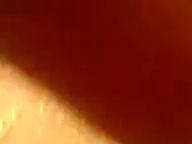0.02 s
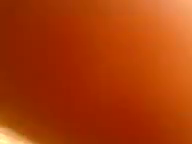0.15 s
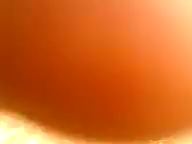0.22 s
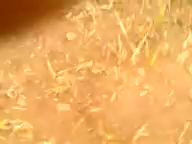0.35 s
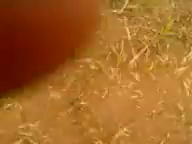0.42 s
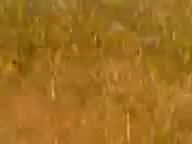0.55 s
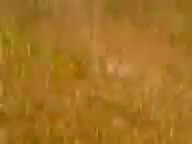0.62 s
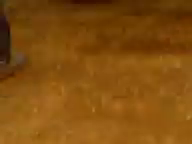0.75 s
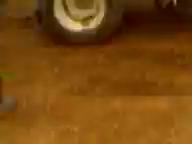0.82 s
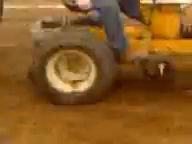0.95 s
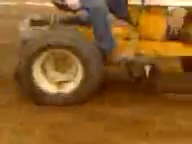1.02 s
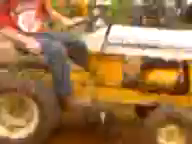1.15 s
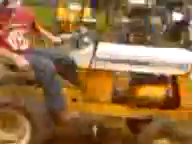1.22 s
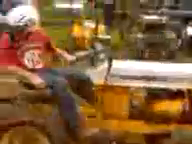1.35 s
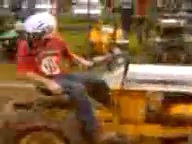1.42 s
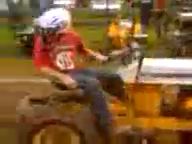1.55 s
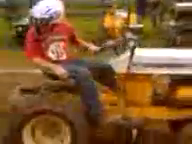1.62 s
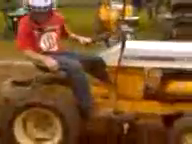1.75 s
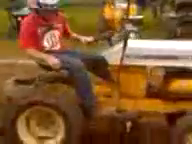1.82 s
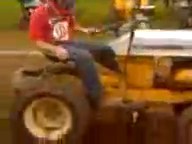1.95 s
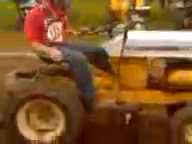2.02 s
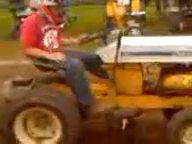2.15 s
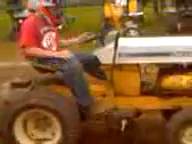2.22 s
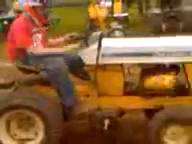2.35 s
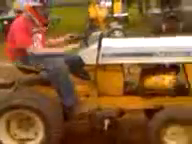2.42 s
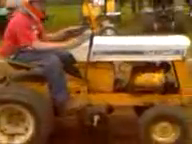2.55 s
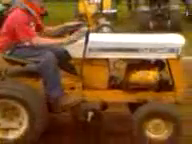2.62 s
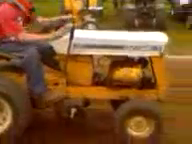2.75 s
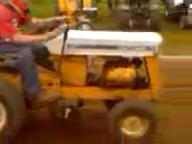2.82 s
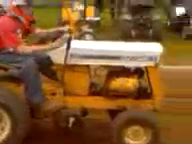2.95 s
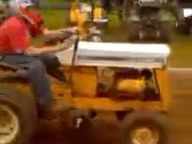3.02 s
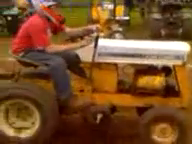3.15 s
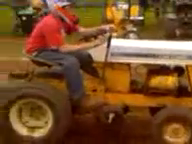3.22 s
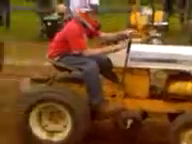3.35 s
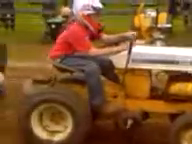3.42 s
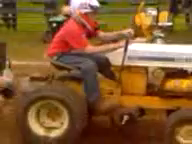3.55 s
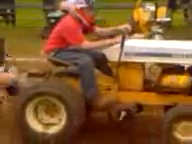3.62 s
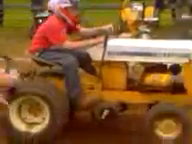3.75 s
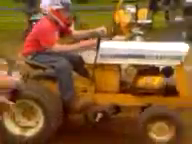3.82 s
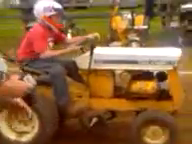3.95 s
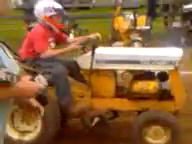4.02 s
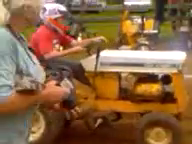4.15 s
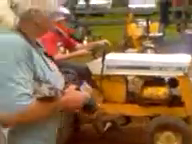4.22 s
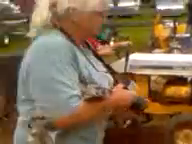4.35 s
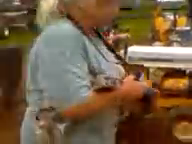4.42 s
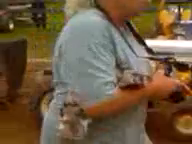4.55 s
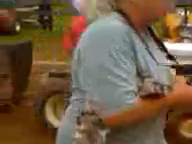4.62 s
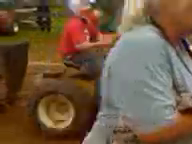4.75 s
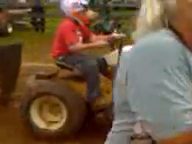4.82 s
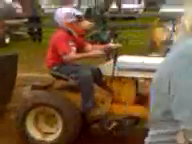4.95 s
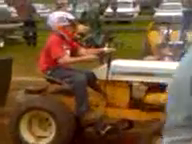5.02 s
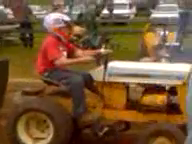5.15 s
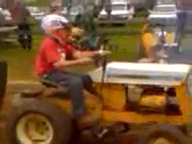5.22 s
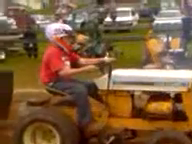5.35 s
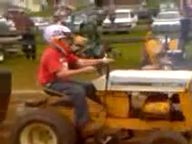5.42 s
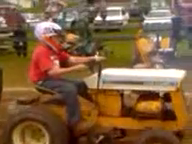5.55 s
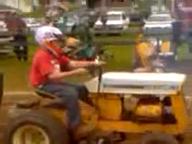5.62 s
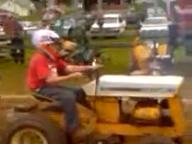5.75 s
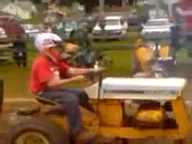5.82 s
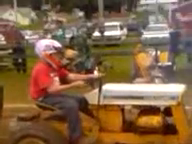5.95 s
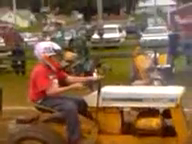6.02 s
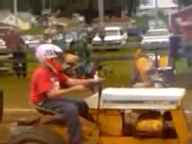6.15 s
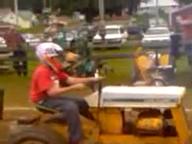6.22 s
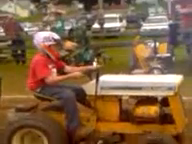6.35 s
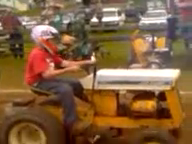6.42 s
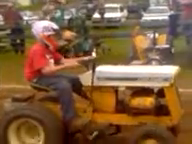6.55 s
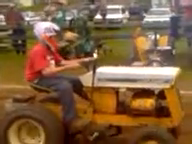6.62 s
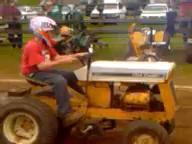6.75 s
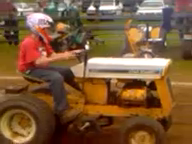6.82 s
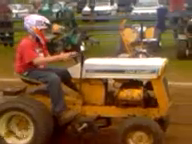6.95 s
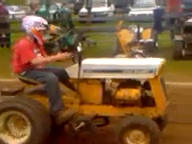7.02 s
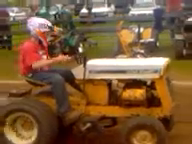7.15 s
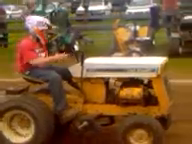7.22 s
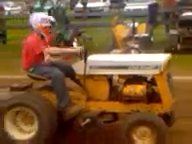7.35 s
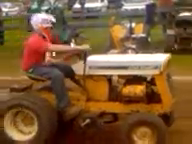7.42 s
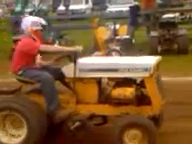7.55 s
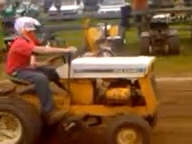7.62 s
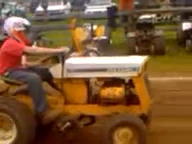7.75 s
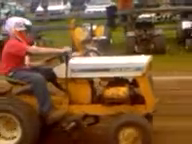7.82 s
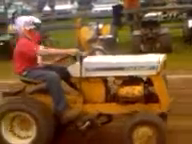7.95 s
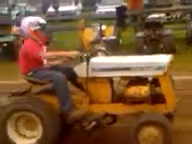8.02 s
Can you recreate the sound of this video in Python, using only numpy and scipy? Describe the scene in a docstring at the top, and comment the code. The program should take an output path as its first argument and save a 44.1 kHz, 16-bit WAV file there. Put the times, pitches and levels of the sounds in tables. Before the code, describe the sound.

Heard through a small, narrow-sounding microphone beside a dirt track, a garden tractor idles with hollow putts and metallic clatter, along with a dull scuff and a sharp handling knock. A little before halfway, the engine cracks and accelerates into a loud, gritty roar as it strains under load. The roar softens for a moment, then climbs in pitch and continues to the end, touched by brief squeals and thin crackles.

```python
"""Garden tractor pull

A single-cylinder garden tractor putts and clatters at idle on a dirt pulling track. The throttle opens:
the exhaust barks, speeds up and merges into a rasping roar as the sled loads the engine, dipping as a
bystander walks past. Early on, a hand cups, rubs and knocks the small, narrow-band camera.
Brief squeals come and go, and thin crackles top the loudest moments."""
import sys
import numpy as np
from scipy import signal
from scipy.fft import rfft, irfft, next_fast_len
from scipy.io import wavfile
from scipy.ndimage import uniform_filter1d, map_coordinates

SR = 44100
rng = np.random.default_rng(int(sys.argv[2]) if len(sys.argv) > 2 else 0)


def digitize_waveform(pressure):
    """Quantize a signal to 16-bit integers and store it at the path in sys.argv[1].

    Rows of a 2-D input are taken as channels; values are limited to [-1, 1].
    """
    field = np.atleast_2d(pressure).T
    bounded = np.clip(field, -1, 1)
    quanta = np.round(bounded * 32767).astype(np.int16)
    wavfile.write(sys.argv[1], SR, quanta)


N = 356769
TIME = np.arange(N) / SR
THROTTLE_OPEN_S = 3.388

# engine speed (time [s], firing rate [Hz])
FIRING_RATE = [(0, 13.36), (.4, 13.41), (.8, 12.68), (1.2, 12.18), (1.8, 12.6), (2.4, 13.15), (3.1, 13.01),
               (3.35, 14.74), (3.5, 15.6), (3.7, 18.33), (3.9, 21.58), (4.15, 24.9), (4.35, 28.07),
               (4.55, 28.66), (5.2, 31), (5.9, 36), (8.1, 38)]
# the pipe's resonances rise together as the throttle is eased open (time [s], pitch [ratio])
PIPE_PITCH = [(0, 1.02), (.55, 1.1), (.95, 0.97), (1.6, 0.97), (2.65, 1.13), (3.2, 1.38), (4.0, 1.43),
              (5.1, 1.32), (5.6, 1.45), (8.1, 1.566)]
# tone colours of soft gas puff, metal clatter, throaty roar and bright rasp (frequency [Hz], level [dB])
PUFF_EQ = [(200, -42.5), (420, -9.5), (560, 0), (750, 0.5), (950, 2.5), (1250, -1), (1600, -2),
           (2100, -18.5), (3500, -21), (5000, -51.5)]
CLATTER_EQ = [(940, -16.5), (1600, -8), (1830, -4), (2000, 0.5), (2270, 1.5), (2360, -1.5), (2560, -2),
              (2690, 1), (2980, -2), (3300, 2), (3700, -11.5), (4300, -27.5), (4590, -52.5), (5970, -84),
              (10100, -120)]
ROAR_EQ = [(280, -29), (480, -6.5), (768, 1), (1030, 2), (1680, -1.5), (1800, -23), (2340, -33.5),
           (3960, -120)]
RASP_EQ = [(970, -46.5), (1650, -12), (2760, 1), (2950, -0.5), (3460, -6.5), (4210, -31.5), (4590, -52.5),
           (5970, -73), (10100, -120)]


def amp(db):
    """Decibels to gain."""
    return 10 ** (np.asarray(db) / 20)


def unit(x):
    """Scale to rms 1."""
    return x / np.sqrt(np.mean(x ** 2) + 1e-20)


def steady(x):
    """Ride the level to rms 1 over every quarter second."""
    power = uniform_filter1d(uniform_filter1d(x * x, SR // 4), SR // 12)
    return x / np.sqrt(np.abs(power) + 1e-12)


def blend(base, extra, strength):
    """Mix two unrelated sounds at constant power."""
    return (base + strength * extra) / np.sqrt(1 + strength ** 2)


def curve(rows):
    """An automation curve through (time, value) points."""
    return np.interp(TIME, *np.transpose(rows))


def swell(s, width_s):
    """A bell-shaped rise and fall round time s."""
    return np.exp(-((TIME - s) / width_s) ** 2)


def wobble(rate):
    """A smooth random curve, rate knots a second."""
    return map_coordinates(rng.standard_normal(int(N * rate / SR) + 4), [TIME * rate])


def scatter(times, spread_db):
    """A random level in dB for each event."""
    return spread_db * rng.standard_normal(len(times))


def filtered(x, response):
    """Zero-phase filter with a gain given as a function of frequency."""
    size = next_fast_len(N + SR // 4)
    return irfft(rfft(x, size) * response(np.fft.rfftfreq(size, 1 / SR)), size)[:N]


def coloured(x, eq):
    """Minimum-phase EQ through (Hz, dB) points."""
    size = 8192
    hz, db = np.transpose(eq)
    gain = amp(np.interp(np.log(np.fft.rfftfreq(size, 1 / SR) + 1), np.log(hz), db))
    cepstrum = irfft(np.log(np.maximum(gain, 1e-5)))
    cepstrum[1:size // 2] *= 2
    cepstrum[size // 2 + 1:] = 0
    return signal.fftconvolve(x, irfft(np.exp(rfft(cepstrum))))[:N]


def impulses(times, sizes):
    """Single-sample kicks at the given times."""
    return np.bincount(np.clip(np.round(times * SR).astype(int), 0, N), sizes, N + 1)[:N]


def bursts(times, db, rise, decay):
    """An envelope that swells and dies away at each time; rise and decay in seconds."""
    t = np.arange(SR // 4) / SR
    shape = (1 - np.exp(-t / rise)) * np.exp(-t / decay)
    return signal.fftconvolve(impulses(times, amp(db)), shape / shape.max())[:N]


def grit(rate, spread_db, smooth):
    """Random pops of uneven size, rate a second, on a bed of smooth noise."""
    pops = (rng.random(N) < rate / SR) * rng.choice([-1, 1], N)
    sizes = amp(spread_db * rng.standard_normal(N).clip(-2, 2))
    return unit(pops * sizes) + smooth * rng.standard_normal(N)


def narrow_band(hz, width_hz):
    """Noise of rms 1 in a narrow band round a pitch that may move."""
    phase = 2 * np.pi * np.cumsum(hz * np.ones(N)) / SR
    return unit(wobble(width_hz) * np.cos(phase) + wobble(width_hz) * np.sin(phase))


def snaps(rows, eq, decay):
    """A sharp burst of coloured noise at each (s, dB) row."""
    s, db = np.transpose(rows)
    noise = rng.standard_normal(N)
    return coloured(bursts(s, db, rise=.00033, decay=decay) * noise, eq) / np.std(coloured(noise, eq))


def firing_times():
    """The cylinder fires each time the cycle count passes a whole number."""
    cycles = np.cumsum(curve(FIRING_RATE)) / SR
    return np.interp(np.arange(int(cycles[-1])), cycles, TIME)


def latest(firings):
    """For each sample, the index of the last firing."""
    return np.searchsorted(firings, TIME, "right") - 1


def rev_gain(db, at_hz, db_per_octave):
    """A gain that follows the revs: db at a firing rate of at_hz, sloping from there."""
    return amp(db + db_per_octave * np.log2(curve(FIRING_RATE) / at_hz))


def putts(firings, force_db, gas, late_gas):
    """Each pressure pulse rings the pipe's lowest note; the cupped hand swells it until it leaves."""
    # hollow body of the putt (frequency [Hz], level [dB])
    putt_eq = [(30, -26), (70, -9), (140, -8.5), (190, -4.5), (250, -5), (330, -1), (480, -3), (700, -21.5),
               (1500, -76.5)]
    cupped = np.clip((.88 - TIME) / .2, 0, 1)
    note_hz = 235.6 * curve(PIPE_PITCH)
    since_firing = TIME - firings[latest(firings)]
    thump = bursts(firings, force_db, rise=.01, decay=.0054) * np.sin(2 * np.pi * note_hz * since_firing)
    breath = coloured((gas + .15 * late_gas + .36) * rng.standard_normal(N), putt_eq)
    putt = blend(steady(breath), steady(thump), .74 + .25 * cupped)
    return rev_gain(-50, at_hz=12.2, db_per_octave=22.5) * amp(3.5 * cupped) * putt


def puffs(gas, late_gas):
    """Gritty gas leaves the pipe, softer as the idle picks up."""
    puff = coloured((gas + .1 * late_gas + .6) * grit(rate=1800, spread_db=2, smooth=.9), PUFF_EQ)
    return rev_gain(-41, at_hz=12.2, db_per_octave=-8.5) * steady(puff)


def pipe_ring(drive, firings, width_hz, stray):
    """The pipe's bright ring swells with the drive, at a slightly new pitch and strength each firing."""
    last = latest(firings)
    detune = 1 + stray * rng.standard_normal(len(firings)).clip(-2, 2)[last]
    strength = amp(scatter(firings, spread_db=2))[last]
    ring_hz = 1972 * curve(PIPE_PITCH) * detune
    return steady(strength * drive * narrow_band(ring_hz, width_hz))


def valve_clatter(firings, gas):
    """The valve gear strikes twice, unevenly, between firings, over gas noise and the pipe's ring."""
    # clatter fader (time [s], level [dB])
    fader = [(0, -39.5), (.25, -35.5), (1.35, -35.5), (2.2, -38.5), (3.0, -36.5), (3.35, -35)]
    valves = bursts(firings + .019, scatter(firings, spread_db=5), rise=.0015, decay=.01)
    valves += bursts(firings + .05, scatter(firings, spread_db=5) + 4, rise=.0026, decay=.016)
    drive = .75 * gas + .25 * valves + .75
    rattle = steady(coloured(drive * grit(rate=1400, spread_db=2.5, smooth=.74), CLATTER_EQ))
    ring = pipe_ring(drive + 1, firings, width_hz=240, stray=.09)
    return amp(curve(fader)) * blend(rattle, ring, .52)


def idle(firings):
    """Each firing gives a hollow putt and a puff of gas; the valve gear clatters in between."""
    # the hardest idle firings (time [s], boost [dB])
    accents = [(.683, 4), (.998, 2), (1.245, 3), (1.565, 6), (1.645, 3), (2.275, 3)]
    force_db = scatter(firings, spread_db=1) + sum(db * (np.abs(firings - s) < .03) for s, db in accents)
    # gas rushes out as the exhaust valve lifts, just ahead of the thump
    gas = bursts(firings - .005, force_db, rise=.004, decay=.018)
    late_gas = bursts(firings + .024, scatter(firings, spread_db=2), rise=.005, decay=.014)
    return putts(firings, force_db, gas, late_gas) + puffs(gas, late_gas) + valve_clatter(firings, gas)


def hand_reflection(x):
    """The reflection off a hand near the microphone cuts a notch that slides down as it moves away."""
    # echo off the hand (time [s], delay [ms], strength [0-1])
    reflection = [(0, 0.079, 0.7), (.22, 0.27, 0), (.33, 0.38, 0.36), (.5, 0.33, 0.14), (.7, 0.61, 0.33),
                  (.9, 0.52, 0)]
    s, delay_ms, strength = np.transpose(reflection)
    echo = np.interp(TIME - np.interp(TIME, s, delay_ms) / 1000, TIME, x)
    return blend(x, echo, np.interp(TIME, s, strength))


def hand_rub():
    """A short, dull scuff of skin on the camera case."""
    scuff = unit(coloured(grit(rate=900, spread_db=6, smooth=.6), PUFF_EQ))
    return amp(-38) * swell(.19, width_s=.12) * scuff


def squeals():
    """Rough tones that swell and fade within a moment."""
    # squeals and rings (time [s], half-width [s], pitch [Hz], bandwidth [Hz], level [dB])
    cues = [(.213, 0.059, 1360, 90, -40), (0.349, .024, 3080, 190, -35), (.376, 0.034, 2200, 129.6, -39),
            (1.21, 0.015, 2010, 347, -29), (5.06, 0.044, 2453, 108, -22.5),
            (5.383, .05, 1034, 300.2, -25.5), (6.087, .021, 2554, 700, -16.5),
            (6.107, 0.033, 3430, 650, -13.5), (6.63, .035, 2130, 200, -22)]
    out = np.zeros(N)
    for s, width_s, hz, width_hz, db in cues:
        pure = np.sqrt(2) * np.sin(2 * np.pi * hz * TIME)
        out += amp(db) * swell(s, width_s) * blend(narrow_band(hz, width_hz), pure, .41)
    return out


def case_knocks():
    """Each knock is a rough crack that rings the camera case's modes at new strengths."""
    # knocks of the hand (time [s], peak level [dB])
    cues = [(1.1675, -9), (1.203, -21)]
    # modes of the case (frequency [Hz], level [dB], time to fall 60 dB [s])
    modes = [(664, -6, 0.031), (880, -7, .03), (1080, -2.5, 0.071), (1745, -1.5, 0.052), (1970, -1, 0.062),
             (2630, -5, 0.03), (2970, -2, .03), (3300, -11, 0.029)]
    out, t = np.zeros(N), np.arange(SR // 5) / SR
    for s, db in cues:
        ring = np.zeros(len(t))
        for hz, mode_db, t60 in modes:
            envelope = amp(mode_db + rng.normal(0, 4.2) - 60 * t / t60)
            ring += envelope * np.sin(2 * np.pi * (hz * t + rng.random()))
        scrape = rng.standard_normal(len(t)) * (np.exp(-t / .0026) + .24 * np.exp(-t / .031))
        crack = filtered(scrape, lambda hz: (hz > 550) & (hz < 3500))[:len(t)]
        hit = (ring + 4 * crack) * (1 - np.exp(-t / .00065))
        out[round(s * SR):][:len(t)] += amp(db) * hit / np.abs(hit).max()
    return out


def metal_ticks():
    """Loose metal on the idling tractor clicks and rings for an instant."""
    # ticks (time [s], relative level [dB])
    cues = [(1.8804, -24), (2.603, -18), (3.1278, -21), (3.1872, -21.5), (3.21, -22)]
    s, db = np.transpose(cues)
    ring = bursts(s, db, rise=.0004, decay=.0056) * np.sin(2 * np.pi * 2750 * TIME)
    return amp(-5.5) * snaps(cues, CLATTER_EQ, decay=.003) + amp(-6) * ring


def exhaust_rasp(flow, firings):
    """The bright, crackling edge of the blasts, with the pipe ringing along."""
    rasp = steady(coloured(flow * grit(rate=2200, spread_db=.5, smooth=1.2), RASP_EQ))
    ring = pipe_ring(flow, firings, width_hz=210, stray=.07)
    return rev_gain(-17, at_hz=38, db_per_octave=6.5) * blend(rasp, ring, .55)


def exhaust_roar(flow):
    """The coarse midrange of the rushing gas; the pipe adds a hollow resonance."""
    rush = (flow + .94) * grit(rate=1300, spread_db=4, smooth=.8) * amp(.76 * wobble(16))
    roar = steady(coloured(rush, ROAR_EQ))
    hollow = steady(flow * narrow_band(1090, width_hz=230))
    return rev_gain(-26.5, at_hz=38, db_per_octave=8.5) * blend(roar, hollow, .45)


def load_rumble(flow):
    """The fluttering low end of the engine under load."""
    # weight of the rumble (frequency [Hz], level [dB])
    rumble_eq = [(15, -46.5), (25, -21), (86, -3.5), (171, -4), (285, 0.5), (560, -1), (730, -24),
                 (1230, -120)]
    # rumble fader (time [s], level [dB])
    fader = [(3.55, -46), (4.2, -38.5), (4.4, -40), (4.85, -33), (5.5, -35.5), (5.9, -32.5), (7.0, -38.5),
             (8.1, -39)]
    churn = (flow + 1.7) * grit(rate=900, spread_db=2, smooth=1.2) * amp(1.8 * wobble(22))
    return amp(curve(fader)) * steady(coloured(churn, rumble_eq))


def pull(firings):
    """Open throttle: every firing is a blast; with speed the blasts grow louder and run together."""
    # gas that keeps flowing between blasts (time [s], strength beside a blast [ratio])
    through_flow = [(3.4, .17), (3.7, .3), (3.83, .8), (4.45, .7), (5, 1.5), (8, 1.7)]
    # the exhaust swells and eases as the sled drags (time [s], level [dB])
    effort = [(3.4, -1.2), (3.65, -.2), (3.95, 1.5), (4.6, -0.8), (5.15, 0.2), (5.45, -1.5), (5.9, -0.8),
              (6.8, -1), (7.2, 1.7), (7.8, 1), (8.1, 0)]
    firings = firings[firings > THROTTLE_OPEN_S - .02]
    blasts = bursts(firings - .003, scatter(firings, spread_db=1), rise=.005, decay=.017)
    flutter_db = .5 * wobble(8) + .6 * wobble(25) + .6 * wobble(220)
    flow = (blasts + curve(through_flow)) * amp(flutter_db)
    shadow = swell(4.367, width_s=.28)  # a bystander walks between tractor and camera
    rasp = amp(curve(effort) - 3 * shadow) * exhaust_rasp(flow, firings)
    roar = amp(.3 * curve(effort) - 2.2 * shadow) * exhaust_roar(flow)
    return rasp + roar + load_rumble(flow)


def exhaust_barks():
    """The first firings on the open throttle crack twice each, bright with a little body."""
    # barks (time [s], relative level [dB])
    cues = [(3.391, -6), (3.459, -8), (3.526, -10.5), (3.584, -8), (3.646, -11), (3.7, -5.5), (3.9, -10)]
    cracks = list(cues) + [(s + .014, db - 2.5) for s, db in cues]
    return amp(-9) * snaps(cracks, RASP_EQ, decay=.0024) + amp(-26) * snaps(cracks, ROAR_EQ, decay=.004)


def crackles():
    """Thin, sharp ticks in the high treble at the loudest moments."""
    # crackles (time [s], peak level [dB])
    cues = [(6.094, -24), (6.0965, -39), (6.1115, -48), (6.1157, -42), (7.835, -48), (7.858, -48)]
    # their brittle colour (frequency [Hz], level [dB])
    crackle_eq = [(3000, -43.5), (5000, -7), (8500, 3), (11000, -7.5), (12500, -13.5), (15500, -15.5)]
    s, db = np.transpose(cues)
    ticks = coloured(impulses(s, amp(db)), crackle_eq)
    return amp(db.max()) * ticks / np.abs(ticks).max()


def scene():
    """Idle gives way to the pull when the throttle opens."""
    firings = firing_times()
    throttle = np.clip((TIME - THROTTLE_OPEN_S) / .005, 0, 1)
    engine = (1 - throttle) * idle(firings) + throttle * pull(firings)
    spot_effects = exhaust_barks() + metal_ticks() + case_knocks() + squeals() + hand_rub()
    return hand_reflection(engine + spot_effects)[None]


def record(dry):
    """The camera rounds off the highest peaks and cuts the upper treble; a few crackles reach above."""
    ceiling, cutoff_hz, crackle_top_hz = .75, 4700, 16000
    rounded = dry[0] / (1 + np.abs(dry[0] / ceiling) ** 6) ** (1 / 6)
    narrow = filtered(rounded, lambda hz: 1 / (1 + (hz / cutoff_hz) ** 80))
    return filtered(narrow + crackles(), lambda hz: hz < crackle_top_hz)[None]


dry = scene()
out = record(dry)
digitize_waveform(out)
```